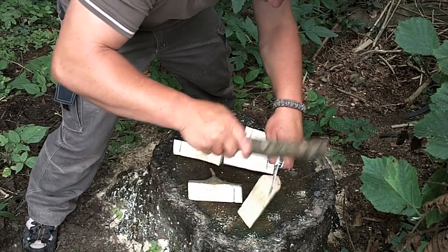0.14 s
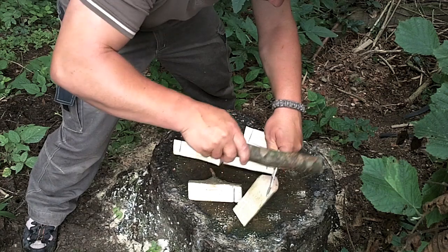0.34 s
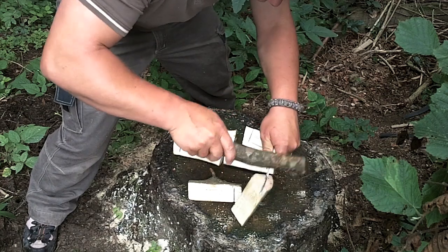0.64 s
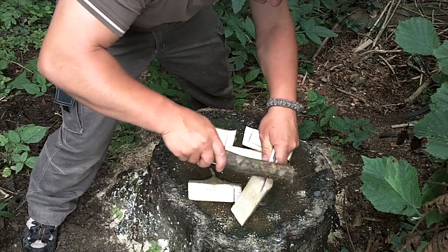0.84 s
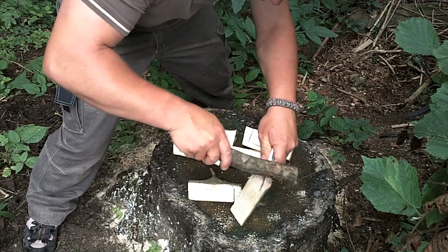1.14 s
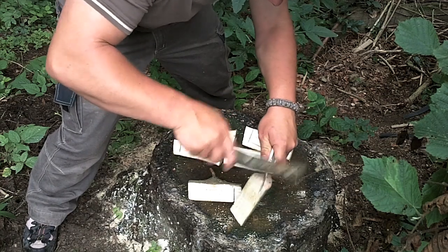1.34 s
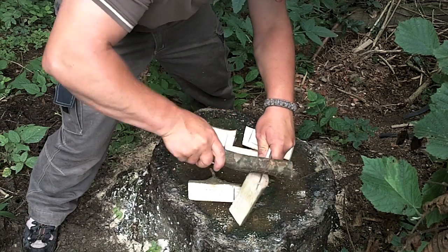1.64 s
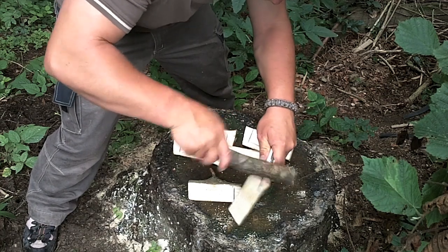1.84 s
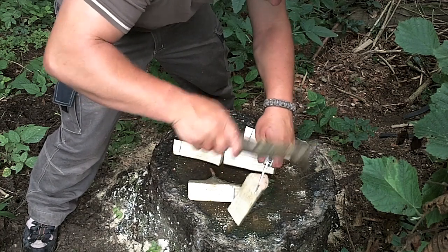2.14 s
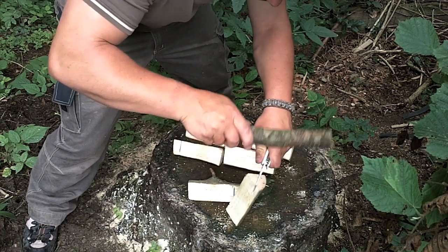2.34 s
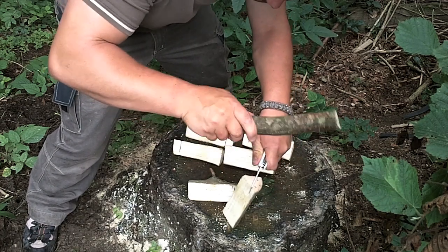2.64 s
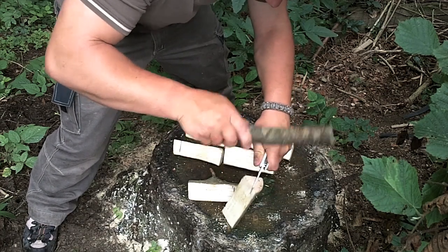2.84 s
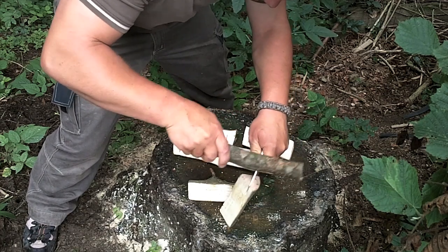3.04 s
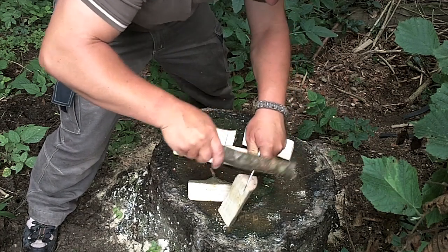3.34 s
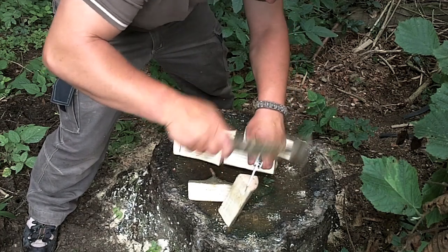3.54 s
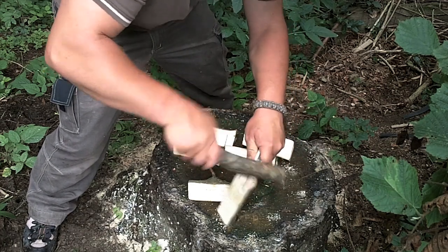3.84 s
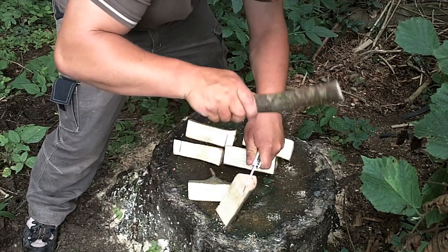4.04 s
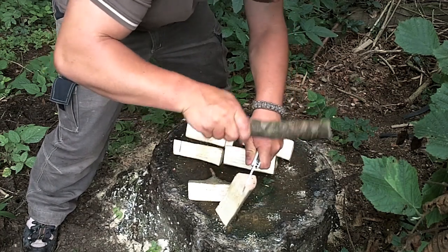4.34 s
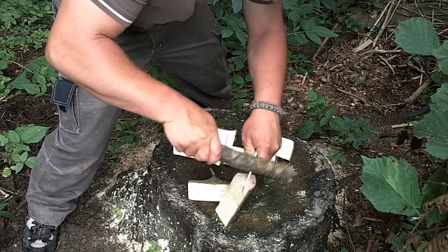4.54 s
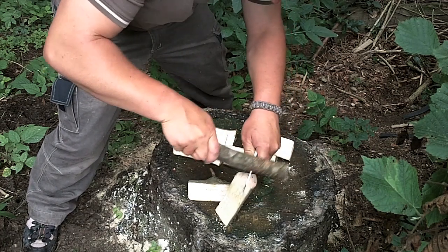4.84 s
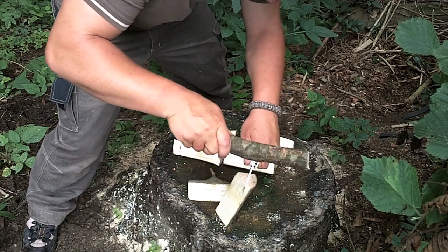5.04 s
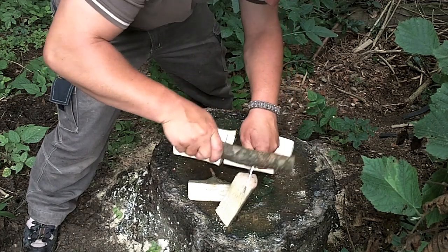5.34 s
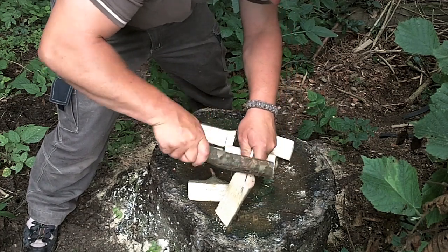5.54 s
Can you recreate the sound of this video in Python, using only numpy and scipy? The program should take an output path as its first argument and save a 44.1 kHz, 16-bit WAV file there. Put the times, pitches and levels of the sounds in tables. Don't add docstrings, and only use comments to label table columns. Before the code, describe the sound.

Steady hard wood-on-blade cracks, very short and dry with a slight metallic edge, each answered by a faint late echo from trees. Blows are slightly slower and stronger after about three seconds, with small rebound knocks and fibre ticks. A pause leads to two feeble thuds. Outdoors, close microphone overloading slightly, with faint rustle, distant sinking plane drone and barely audible bird chirps.

```python
import sys
import numpy as np
from scipy import signal
from scipy.fft import rfft, irfft, next_fast_len
from scipy.io import wavfile
from scipy.ndimage import uniform_filter1d, map_coordinates

SR = 44100
rng = np.random.default_rng(int(sys.argv[2]) if len(sys.argv) > 2 else 0)


def amplitude_ratio(level_db):
    exponent = np.asarray(level_db, float) / 20
    return 10 ** exponent


def bounce(signal):
    frames = np.transpose(np.atleast_2d(signal))
    limited = np.clip(frames, -1, 1)
    pcm = np.round(limited * 32767).astype(np.int16)
    wavfile.write(sys.argv[1], SR, pcm)


N = 250929


def unit(x):
    return x / np.sqrt(np.mean(x ** 2) + 1e-20)


def along(points, hz):
    f, v = np.transpose(points)
    return np.interp(np.log(hz + 1), np.log(f + 1), v)


def curves(rows):
    s, *cols = np.transpose(rows)
    return [np.interp(np.arange(N) / SR, s, c) for c in cols]


def wobble(rate):
    knots = rng.standard_normal(int(N * rate / SR) + 4)
    return map_coordinates(knots, [np.arange(N) * rate / SR])


def filtered(x, response):
    m = next_fast_len(len(x) + 8192)
    return irfft(rfft(x, m) * response(np.fft.rfftfreq(m, 1 / SR)), m)[:len(x)]


def add(track, s, sound):
    at = round(s * SR)
    part = track[max(at, 0):max(at + len(sound), 0)]
    part += sound[max(-at, 0):][:len(part)]


def rush(spectrum, patchy_db):
    z = signal.stft(rng.standard_normal(N), nperseg=512)[2]
    patches = uniform_filter1d(rng.standard_normal(z.shape), 6, 0)
    patches = unit(uniform_filter1d(patches, 14, 1))
    noise = signal.istft(z * amplitude_ratio(patchy_db * patches), nperseg=512)[1][:N]
    return unit(filtered(noise, lambda hz: amplitude_ratio(along(spectrum, hz))))


def air():
    # pitch_hz, level_db
    rumble_colour = [(15, -3), (28, 2), (65, 4), (110, -0.5), (170, -10), (350, -5), (600, -13),
                     (1000, -12.5), (1500, -37)]
    # pitch_hz, level_db
    leaf_colour = [(300, -43), (700, -6), (1500, -2.5), (2500, -3), (3500, 0.5), (4700, 0.5), (6000, -7.5),
                   (7500, -11.5), (9500, -12.5), (12000, -17), (15200, -22.5), (15400, -61)]
    # rumble_db, leaves_db
    rumble_db, leaves_db = (-56.5, -56)
    rumble = amplitude_ratio(rumble_db) * rush(rumble_colour, patchy_db=-1.0)
    return rumble + amplitude_ratio(leaves_db) * rush(leaf_colour, patchy_db=1.4)


def plane():
    # start_s, blade_pitch_hz, level_db, orders_against_blade_tone_db
    flight = [(0, 128, -67.5, 9.5), (1, 133, -62, -3), (1.6, 134, -64.5, -10), (2.6, 130, -63.5, -2),
              (3.5, 124, -58.5, -6), (4.2, 114.5, -57, -8), (4.7, 104.7, -62.5, -1),
              (5.69, 92.6, -63, -7.5)]
    # multiple_of_blade_pitch, level_db
    orders = [(.5, -5.5), (1.5, -10.5), (2, -16.5), (3, -10), (3.5, -16), (4, -12.5)]
    hz, db, orders_db = curves(flight)
    turn = 2 * np.pi * np.cumsum(hz * (1 + 0.004 * wobble(6))) / SR
    blade_tone = amplitude_ratio(0.49 * wobble(1.2)) * np.sin(turn)
    engine = sum(amplitude_ratio(orders_db + level + 3 * wobble(3)) * np.sin(k * turn) for k, level in orders)
    return np.sqrt(2) * amplitude_ratio(db) * (blade_tone + engine)


def bird():
    # start_s, peak_db, pitch_hz, length_s
    calls = [
        (3.328, -55, 3510, 0.032),
        (3.955, -49, 3460, 0.011),
        (5.19, -51, 3420, 0.019),
    ]
    track = np.zeros(N)
    for s, db, hz, length in calls:
        t = np.arange(round(length * SR)) / SR
        whistle = np.sin(2 * np.pi * hz * t * (1 - .5 * t))
        add(track, s, amplitude_ratio(db) * np.hanning(len(t)) * whistle)
    return track


def small_knocks(rows, cycles, noise):
    track, t = np.zeros(N), np.arange(1024) / SR
    for s, db, hz in rows:
        hiss = noise * amplitude_ratio(-60 * t / 0.0051) * uniform_filter1d(rng.standard_normal(len(t)), size=2)
        tone = amplitude_ratio(-60 * t * hz / cycles) * np.sin(2 * np.pi * hz * t)
        add(track, s, amplitude_ratio(db) * (tone + hiss))
    return track


def fibre_ticks():
    # start_s, peak_db, pitch_hz
    ticks = [(1.124, -50, 9100), (1.487, -28, 2180), (1.644, -44, 7000), (2.847, -37, 2000),
             (3.981, -32, 4400), (3.985, -42, 6450), (4.899, -31, 2400), (5.024, -33, 4530),
             (5.222, -45.5, 12600), (5.225, -45, 9740), (5.566, -59, 9500)]
    return small_knocks(ticks, cycles=22, noise=0.38)


def settling_knocks():
    # start_s, peak_db, pitch_hz
    rebounds = [
        (2.858, -34, 1500),
        (3.416, -21, 1280),
        (3.716, -27, 656),
        (5.4056, -23, 1930),
        (5.407, -21, 330),
        (5.41, -21, 1330),
        (5.418, -25, 520),
    ]
    return small_knocks(rebounds, cycles=11, noise=0.071)


def ring(modes, t, attack, scatter_db, scatter_phase):
    hz, db, t60 = np.transpose(modes)[..., None]
    luck = rng.standard_normal((3, len(modes), 1))
    detune = 1 + .015 * luck[0]
    swing = np.sin(2 * np.pi * hz * detune * t + scatter_phase * luck[1])
    decay = amplitude_ratio(db + scatter_db * luck[2] - 60 * t / t60)
    sound = -(1 - np.exp(-t / attack)) * np.sum(decay * swing, axis=0)
    return sound / np.linalg.norm(sound)


def splinters(t):
    # pitch_hz, level_db
    crack_colour = [(3000, -49), (5500, 7), (7000, 0.5), (10000, 3.5), (13000, -2.5), (15500, -4),
                    (17000, -15)]
    crack = filtered(rng.standard_normal(len(t)), lambda hz: amplitude_ratio(along(crack_colour, hz)))
    snap = (1 - np.exp(-t / .0005)) * amplitude_ratio(-60 * t / .007)
    fray = amplitude_ratio(-23 - 60 * t / 0.034)
    crack = crack * (snap + fray)
    return crack / np.linalg.norm(crack)


def blow(s, strength_db, thud_db, bite_db, stick_hz):
    # pitch_hz, level_db, t60_s
    stump_modes = [(164, -16.5, 0.015), (330, -1.5, 0.012), (520, -10, 0.033), (748, 10, 0.01),
                   (923, 3, 0.021)]
    # multiple_of_stick_pitch, level_db, t60_s
    stick_modes = [(.84, -45, 0.0041), (1, 14.5, 0.007), (1.162, 13.5, 0.0046)]
    # pitch_hz, level_db, t60_s
    across_mode = (2145, 5.9, 0.0087)
    # pitch_hz, level_db, t60_s
    billet_modes = [(3050, -2, .011), (3350, 0, .011), (3750, 0, .011)]
    # multiple_of_blade_pitch, level_db, t60_s
    blade_modes = [(.87, -5, 0.011), (0.95, -2.5, 0.013), (1.01, -0.5, 0.013), (1.065, -8.5, 0.009)]

    t = np.arange(2048) / SR
    gape = np.interp(s, [3.25, 4.9], [0, 1])
    billet_db = -6 + 5 * gape + bite_db
    blade_db = -2.8 + bite_db
    crack_db = -13.5 + 3 * gape + bite_db
    billet_pitch = 1 - 0.092 * gape
    blade_hz = 4647 - 4.5 * thud_db

    stick_now = [(k * stick_hz, db, t60) for k, db, t60 in stick_modes] + [across_mode]
    billet_now = [(hz * billet_pitch, db, t60) for hz, db, t60 in billet_modes]
    blade_now = [(k * blade_hz, db, t60) for k, db, t60 in blade_modes]
    stick = ring(stick_now, t, attack=.0003, scatter_db=1.5, scatter_phase=.08)
    thud = ring(stump_modes, t, attack=0.0004, scatter_db=1.2, scatter_phase=0.05)
    billet = ring(billet_now, t, attack=0.0005, scatter_db=1.5, scatter_phase=0.39)
    blade = ring(blade_now, t, attack=0.00048, scatter_db=4.0, scatter_phase=0.56)

    grip = amplitude_ratio(-60 * (t / 0.017) ** 2)
    held = grip * (stick + amplitude_ratio(billet_db) * billet + amplitude_ratio(blade_db) * blade)
    sound = amplitude_ratio(thud_db - 2.6) * thud + held + amplitude_ratio(crack_db) * splinters(t)

    cancel_hz, wide_hz = 1166, 228
    cancel = 0.71 * min(amplitude_ratio(thud_db + 3.5), 1)
    sound = filtered(sound, lambda f: 1 - cancel * 1j * f * wide_hz / (cancel_hz ** 2 - f * f + 1j * f * wide_hz))
    add(sound, .0043, amplitude_ratio(-35.5) * sound.copy())
    return amplitude_ratio(strength_db + 16.0) * filtered(sound, lambda hz: (1j * hz / (180 + 1j * hz)) ** 2)


def echo(sound, near_db, far_db):
    # pitch_hz, t60_s
    trunk_fade = [(300, 0.2), (1500, 0.8), (4500, 0.56), (9000, 0.39), (15000, 0.62)]
    # pitch_hz, level_db
    trunk_colour = [(200, 8), (800, 2.5), (1200, 3), (1550, 2), (1900, -3.5), (2300, 3), (3500, 5.5),
                    (4600, 6), (5200, 4), (6000, 9), (9000, 6), (15200, -8), (15400, -36)]
    hz, t, z = signal.stft(rng.standard_normal(SR), SR, nperseg=256)
    level_db = along(trunk_colour, hz)[:, None] - 60 * t / along(trunk_fade, hz)[:, None]
    far = signal.istft(z * amplitude_ratio(level_db), SR, nperseg=256)[1][:SR]
    t = np.arange(SR) / SR
    far = far * (1 - np.exp(-(t / .025) ** 2))
    near = uniform_filter1d(rng.standard_normal(SR), size=3) * amplitude_ratio(-60 * t / 0.067) * (t > .003)
    blurred = np.sqrt(np.abs(uniform_filter1d(np.abs(rfft(sound, SR)) ** 2, size=800)))
    trunks = amplitude_ratio(far_db) * irfft(rfft(far) * blurred, SR) / np.linalg.norm(far)
    scatter = signal.fftconvolve(sound[:256], near)[:SR] / np.linalg.norm(near)
    return trunks + amplitude_ratio(near_db) * scatter


def baton():
    # start_s, strength_db, stump_thud_against_stick_db, edge_bite_db, stick_pitch_hz
    blows = [(0.3067, -3.5, -4, 0, 1720), (0.6262, -3, -5, 0, 1710), (0.9466, -3, -5, 0.5, 1700),
             (1.2159, -3, -1.5, -.5, 1690), (1.4916, -2, -5, -1.9, 1630), (1.7596, -4, -2.5, 0.6, 1666),
             (2.0211, -1.5, -7, 0.5, 1660), (2.302, -1.6, -8, 0.1, 1690), (2.5785, -3, -3.5, 0, 1660),
             (2.8495, -1, -14, -.3, 1675), (3.1113, -2.5, -5, 1.7, 1620), (3.4047, -0.5, -28.5, 0.6, 1720),
             (3.7037, 1.3, -10, -0.6, 1846), (3.9894, 1.5, -15.5, -2, 1770), (4.2944, 0.4, -22, -0.5, 1894),
             (4.597, -0.8, -10.5, 0.1, 1930), (4.907, -0.8, -10.5, -1.2, 2024), (5.406, -13, 4.5, -4, 1880),
             (5.6631, -10.5, 3.5, 4, 1870)]
    earlier_blow = (-.016, -1, -8, 0, 1655)
    track = np.zeros(N)
    for row in [earlier_blow, *blows]:
        sound = blow(*row)
        add(track, row[0], sound)
        add(track, row[0], echo(sound, near_db=-22, far_db=-27))
    return track


def scene():
    background = air() + plane() + bird()
    small = fibre_ticks() + settling_knocks()
    return (background + small + baton())[None]


def saturate(x, top, hardness):
    return x / (1 + np.abs(x / top) ** hardness) ** (1 / hardness)


def roll_off(x):
    return signal.sosfilt(signal.butter(12, 17140, fs=SR, output="sos"), x)


def record(dry):
    # centre_hz, width_hz
    notches = [
        (2695, 687),
        (5505, 800),
        (7865, 1830),
        (10925, 1280),
    ]
    # pitch_hz, level_db
    band_limit = [(14800, -0.5), (15900, -5), (17000, -23.5), (17250, -80)]
    x = saturate(dry[0], top=1.4, hardness=4)
    for c, w in notches:
        x = filtered(x, lambda f: (c * c - f * f) / (c * c - f * f + 1j * f * w))
    x = saturate(x, top=.99, hardness=9)
    x = filtered(x, lambda f: amplitude_ratio(along(band_limit, f)))
    return roll_off(x[None])


dry = scene()
out = record(dry)
bounce(out)
```